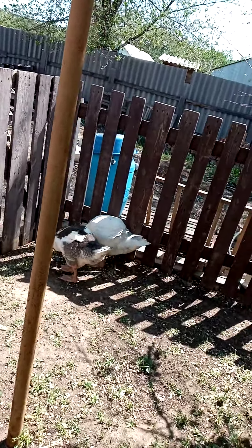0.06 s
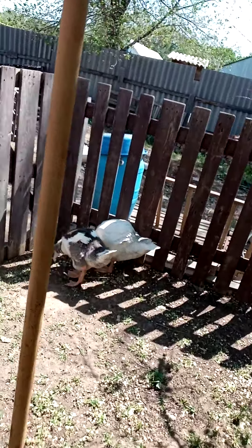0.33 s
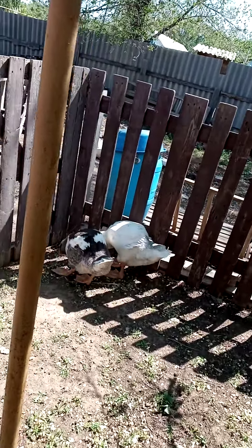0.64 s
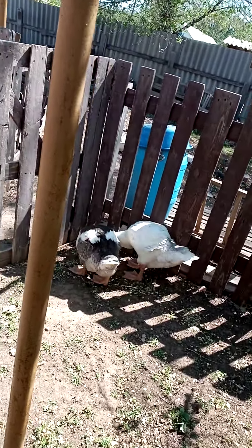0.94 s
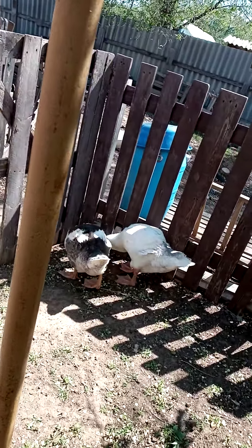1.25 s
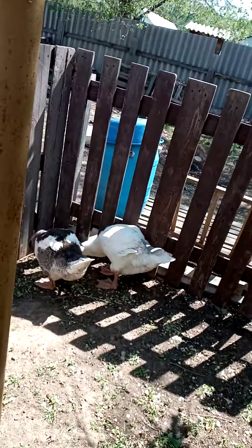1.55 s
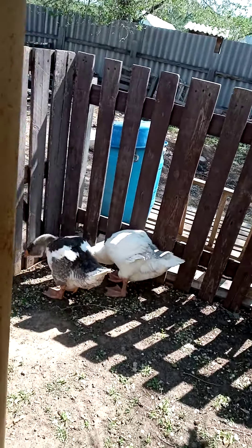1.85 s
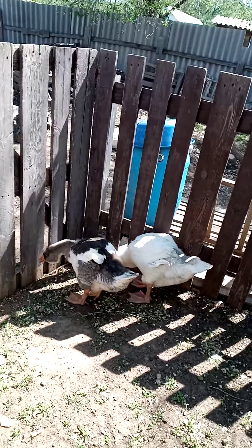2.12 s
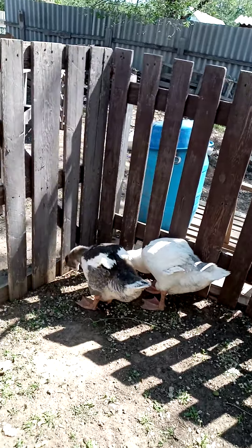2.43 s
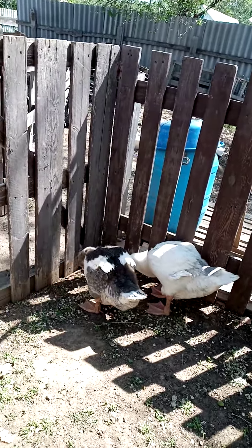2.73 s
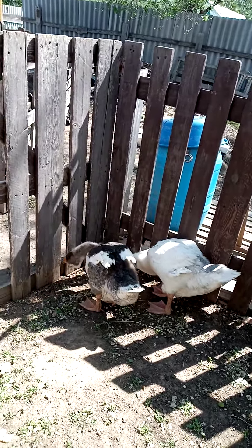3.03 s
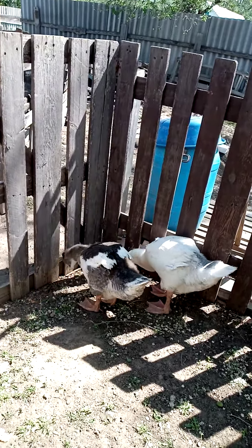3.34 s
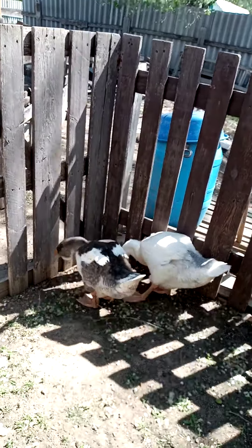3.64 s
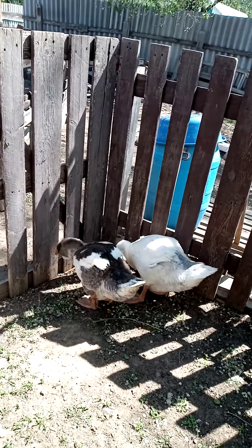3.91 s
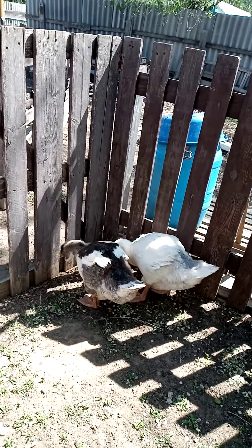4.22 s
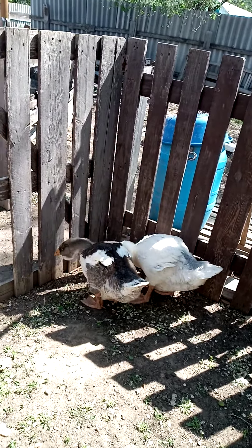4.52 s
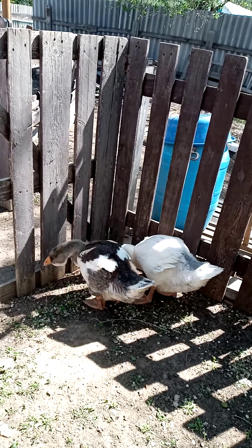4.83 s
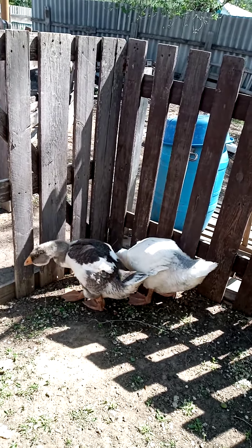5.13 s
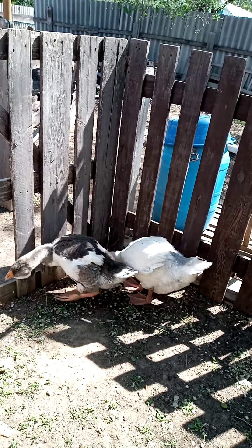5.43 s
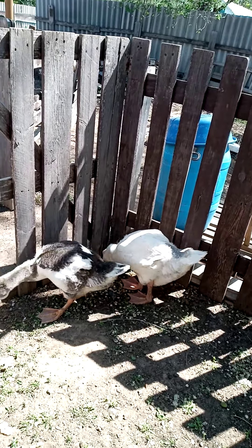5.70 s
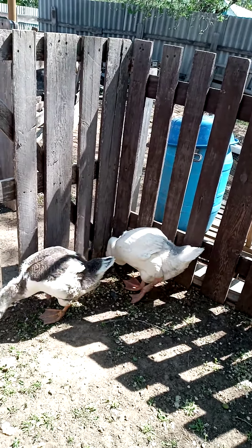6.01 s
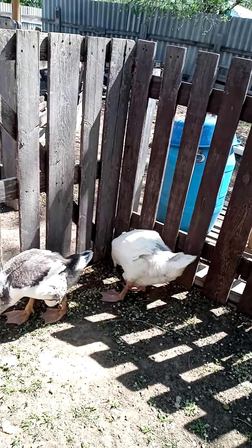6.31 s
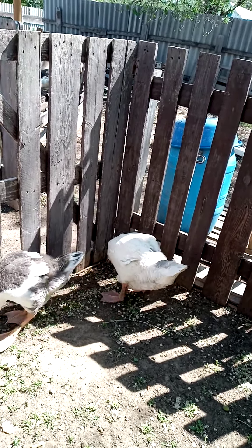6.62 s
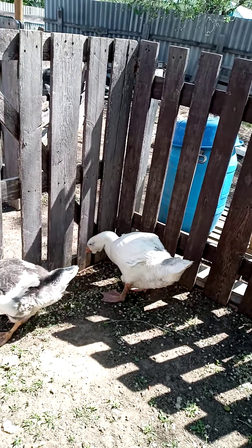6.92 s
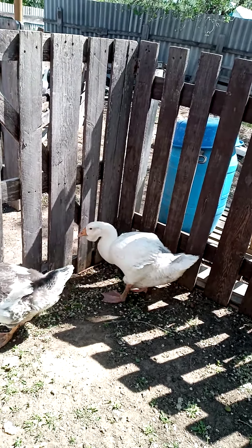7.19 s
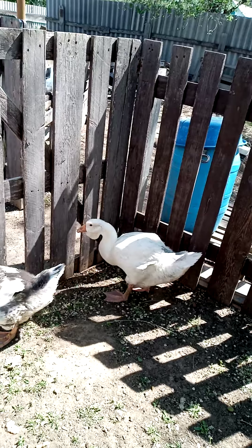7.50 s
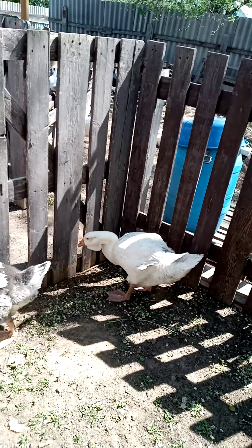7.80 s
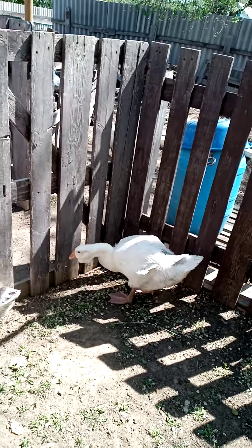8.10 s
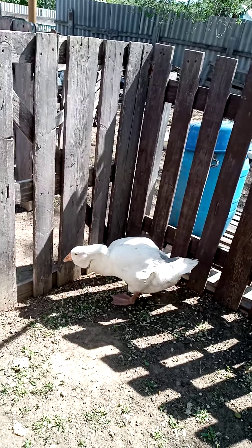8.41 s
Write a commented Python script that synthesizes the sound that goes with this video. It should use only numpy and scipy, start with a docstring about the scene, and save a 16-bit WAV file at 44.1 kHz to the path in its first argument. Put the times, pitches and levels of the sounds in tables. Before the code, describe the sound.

Young geese chatter in a rapid run of thin peeps and hoarse calls, with low thuds on the microphone underneath.

```python
"""Thin, arched peeps over a low rumble: two young geese chatter by a wooden fence in a backyard.
Each call is one push of air that sets a membrane of the syrinx vibrating: near-periodic motion gives
whistles, chaotic motion hoarse rasps, and a break to the octave below a few honks. The fences reflect
the calls as short echoes. Air puffs and handling thud and rustle on a hand-held microphone."""
import sys
import numpy as np
from scipy import signal
from scipy.fft import rfft, irfft, next_fast_len
from scipy.io import wavfile
from scipy.ndimage import map_coordinates

SR = 44100
rng = np.random.default_rng(int(sys.argv[2]) if len(sys.argv) > 2 else 0)


def persist_wave(psi):
    """Save psi, clipped to +-1, as 16-bit WAV."""
    counts = np.round(np.clip(psi, -1, 1) * 32767).astype(np.int16)
    wavfile.write(sys.argv[1], SR, np.atleast_2d(counts).T)


N = 377055

# hoarse calls that clear into a whistle at the crest:
# (start [s], crest [s], end [s], crest pitch [Hz], core level [dB], hiss level [dB], whistle level [dB])
RASP_CALLS = [(0.292, 0.393, 0.494, 1694, -40.5, -54.0, -51.5),
              (1.678, 1.798, 1.952, 1970, -46.0, -56.0, -51.0),
              (2.098, 2.32, 2.408, 2213, -38.5, -48.5, -31),
              (2.445, 2.543, 2.702, 2164, -37.5, -53.0, -46.5), (2.72, 2.848, 3.003, 1800, -41, -50, -48),
              (2.99, 3.037, 3.114, 2620, -40.0, -51.0, -40),
              (3.132, 3.24, 3.374, 1940, -32.5, -43.0, -39.0),
              (3.576, 3.687, 3.798, 2021, -33.5, -41.0, -37.5),
              (4.01, 4.128, 4.228, 2109, -33.5, -40.0, -31.5),
              (4.484, 4.589, 4.698, 2069, -40.0, -41.5, -33.0),
              (4.95, 5.058, 5.128, 2063, -38.5, -39.5, -29.5),
              (5.511, 5.548, 5.631, 2050, -39.0, -44.0, -42.5),
              (5.925, 6.028, 6.123, 2058, -38.5, -46, -38.5), (6.5, 6.54, 6.634, 1960, -45.0, -43.0, -36.5),
              (6.96, 7.017, 7.128, 2000, -39, -43.0, -35.0), (7.52, 7.562, 7.688, 1979, -45, -42.5, -34.5),
              (8.075, 8.146, 8.236, 1906, -45.0, -44.5, -36.0)]


def amp(db):
    """Decibels to amplitude ratio."""
    return 10 ** (np.asarray(db) / 20)


def unit(x):
    """Normalise to rms 1."""
    return x / np.sqrt(np.mean(x ** 2) + 1e-20)


def along(points, hz):
    """Interpolate (frequency [Hz], value) points on a logarithmic frequency axis."""
    f, v = np.transpose(points)
    return np.interp(np.log(hz + 1), np.log(f + 1), v)


def curve(rows):
    """Interpolate (time [s], value) points linearly over the scene."""
    return np.interp(np.arange(N) / SR, *np.transpose(rows))


def wobble(rate, n):
    """Smooth random modulation: n samples of a spline with rate knots a second."""
    knots = rng.standard_normal(int(n * rate / SR) + 4)
    return map_coordinates(knots, [np.arange(n) * rate / SR], mode="wrap")


def filtered(x, response):
    """Linear filtering: multiply the spectrum by a frequency response."""
    m = next_fast_len(len(x) + 8192)
    return irfft(rfft(x, m) * response(np.fft.rfftfreq(m, 1 / SR)), m)[:len(x)]


def noise(spectrum):
    """White noise shaped to a spectrum, at rms 1."""
    return unit(filtered(rng.standard_normal(N), lambda hz: amp(along(spectrum, hz))))


def add(track, s, sound):
    """Superpose a sound on a track from s seconds on."""
    i = max(0, round(s * SR))
    part = track[i:i + len(sound)]
    part += sound[:len(part)]


def yard():
    """Ambient noise: a faint broadband floor under slow amplitude modulation."""
    # background spectrum: (frequency [Hz], level [dB])
    spectrum = [(30, -31), (150, -1), (450, -10.5), (800, -7), (1400, 0.5), (2000, -4), (3100, -13),
                (4400, -16.5), (5400, -20), (7300, -13.5), (9400, -35), (11200, -25.5), (13300, -48.5),
                (15300, -37), (16000, -57)]
    return amp(-53.5 + 2.4 * wobble(4.2, N)) * noise(spectrum)


def scuffs():
    """Friction noise of handling: dry scuffs rise fast and fade grittily over a faint rustle."""
    # scuffs: (time [s], level [dB], decay scale [s])
    strokes = [(0.245, -41.5, 0.082), (0.592, -48, 0.021), (1.132, -47, 0.067), (1.413, -45.5, 0.016),
               (1.525, -51, 0.13), (1.623, -44, 0.042), (1.959, -48.5, 0.078), (3.606, -46, 0.072),
               (4.936, -46, 0.078), (5.116, -35.5, 0.035), (5.457, -40.5, 0.022), (5.526, -40, 0.066),
               (6.133, -41.5, 0.03), (6.206, -42.5, 0.059), (6.661, -45.5, 0.038), (6.799, -42.5, 0.02),
               (7.407, -54.5, 0.16), (8.447, -52.5, 0.13), (8.532, -47.5, 0.06)]
    # rustle envelope: (time [s], level [dB])
    rustle_levels = [(0, -63.5), (.35, -52.5), (.9, -64), (2.1, -56.5), (2.8, -73.5), (4.8, -85.5),
                     (5.3, -56), (7.3, -58.5), (7.6, -77)]
    # friction spectrum: (frequency [Hz], level [dB])
    spectrum = [(300, -27.5), (1400, 2), (2500, 0), (3500, -5), (5000, -13.5), (7200, 0), (9700, -13),
                (11200, -13.5), (13300, -19), (15200, -14), (16000, -3)]
    force = np.zeros(N)
    for s, db, length in strokes:
        u = np.arange(round(2 * length * SR) + 2) / (length * SR)
        add(force, s, amp(db + 4.5) * (1 - np.exp(-u / 0.044)) * np.exp(-1.2 * u - 1.07 * u * u))
    rustle = amp(curve(rustle_levels) + 4 * wobble(22, N))
    grit = unit(amp(3.8 * wobble(450, N)))
    return (force + rustle) * grit * noise(spectrum)


def thuds():
    """Pressure fluctuations from air puffs and handling: an uneven rumble and quickly damped blows."""
    # blows on the microphone: (time [s], level [dB], knock relative to that level [dB])
    blows = [(0.688, -22, -45), (0.837, -16.5, -32), (1.549, -17.5, -12.5), (1.593, -18.5, -21),
             (2.039, -18.5, -29), (2.268, -25.5, -17.5), (2.56, -17.5, -24), (3.018, -15.5, -13.5),
             (3.057, -17.5, -15), (3.099, -11, -15), (3.392, -16.5, -23), (3.883, -23, -22.5),
             (5.877, -27.5, -30), (5.964, -29, -30), (6.38, -17, -20), (6.43, -16.5, -18.5),
             (6.808, -10.5, -16), (6.951, -17, -17), (7.102, -19.5, -32), (7.218, -16, -27),
             (7.327, -17, -22), (7.777, -16, -8.5), (8.347, -24, -36)]
    # rumble envelope: (time [s], level [dB])
    buffeting = [(0.0, -45.5), (0.55, -54), (0.93, -42), (1.17, -50.5), (2.36, -39.5), (2.64, -45.5),
                 (3.5, -37.5), (3.88, -46.5), (4.9, -57.5), (6.31, -62.5), (6.53, -54), (6.76, -49.5),
                 (6.9, -46), (7.24, -37.5), (7.43, -45.5), (8.0, -42), (8.31, -52), (8.55, -49)]
    # spectra of the rumble and of a blow's deep thump and higher knock: (frequency [Hz], level [dB])
    rumble_spectrum = [(15, -26), (30, -23.5), (60, -1.5), (100, 3), (160, -4), (230, -12.5), (330, -24.5),
                       (500, -58), (1200, -85)]
    thump_spectrum = [(20, -29), (50, -6), (110, -2.5), (170, -0.5), (260, -21.5), (400, -36.5),
                      (1000, -77.5)]
    knock_spectrum = [(80, -30), (250, 13.5), (350, 0.5), (500, -11), (800, -25), (2000, -83), (5000, -87)]
    out = amp(curve(buffeting) + 1.62 + 5.4 * wobble(36, N)) * noise(rumble_spectrum)
    attack_s, t60_s = 0.0079, 0.12
    t = np.arange(SR // 5) / SR
    push = (1 - np.exp(-t / attack_s)) * amp(-60 * t / t60_s)
    thump, knock = noise(thump_spectrum), noise(knock_spectrum)
    for s, db, knock_db in blows:
        i = rng.integers(N - len(t))
        add(out, s, amp(db - 20) * unit(push * thump[i:i + len(t)]))
        add(out, s, amp(db + knock_db - 13.5) * unit(push * knock[i:i + len(t)]))
    return out


def fences(x, early_db, tail_db):
    """Reflection: near boards return eight early echoes, the rest of the yard an exponential tail."""
    # reverberation time: (frequency [Hz], time to fall 60 dB [s])
    t60 = [(200, 0.47), (1800, 0.52), (5000, 0.41), (12000, 0.29)]
    hz, t, bands = signal.stft(rng.standard_normal(SR // 2), SR, nperseg=256)
    decay = amp(-60 * t / along(t60, hz)[:, None])
    tail = signal.istft(bands * decay, SR, nperseg=256)[1]
    response = amp(tail_db) * tail / np.linalg.norm(tail)
    for delay_s, gain in zip(rng.uniform(0.002963, .025, size=8), unit(rng.standard_normal(8))):
        add(response, delay_s, np.array([amp(early_db) * gain / np.sqrt(8)]))
    return signal.fftconvolve(x, response)[:N]


def gesture(start, crest, end, crest_hz, db_per_oct, taper):
    """One push of air arches pitch and loudness together; returns the phase and an envelope of rms 1."""
    rise_oct, fall_oct, reference_s = .32, .42, .1  # depths for a slope this long; longer ones go lower
    u = np.linspace(0, 1, max(64, round((end - start) * SR)))
    t = start + u * (end - start) - crest
    slope_s = np.where(t < 0, abs(crest - start), abs(end - crest)) + 1 / SR
    depth_oct = np.where(t < 0, rise_oct, fall_oct) * np.sqrt(slope_s / reference_s)
    octaves = -depth_oct * (t / slope_s) ** 2
    arch = np.abs(np.sin(np.pi * u)) ** taper * amp(db_per_oct * octaves)
    return 2 * np.pi * np.cumsum(crest_hz * 2 ** octaves) / SR, unit(arch)


def syrinx(phase, arch, db, rough, overtone_db, half_db, db_per_oct, count):
    """Period doubling: alternate membrane cycles differ, adding partials halfway between harmonics."""
    n = len(phase)
    jitter = (0.2 + rough) * wobble(338.4, n)
    waver = 1.2 * wobble(55, n)
    phase = phase + jitter + waver
    growl = 1 + .3 * np.sin(phase / 11 + 1.5 * wobble(90, n))  # a loose flap of the membrane
    tone = growl * np.sin(phase)
    for ratio in np.delete(np.arange(1, count + 1), 1) / 2:  # 0.5, 1.5, 2, 2.5, ...
        if ratio < 2:
            level = half_db + 0.5 * overtone_db
        else:
            level = overtone_db + db_per_oct * np.log2(ratio / 2) + half_db * 0.74 * (ratio % 1 > 0)
        flicker = amp(4 * wobble(45, n))
        partial = np.sin(ratio * phase + rng.uniform(0, 2 * np.pi))
        tone += amp(level) * flicker * arch ** .5 * partial  # a harder push gives a richer tone
    shimmer = unit(amp((1 + 4.54 * rough) * wobble(279.4, n)))
    return amp(db) * arch * tone * shimmer


def honks():
    """Register break: the voice drops an octave to a full harmonic series, filtered by the throat."""
    # glides of the second harmonic:
    # (start [s], end [s], first frequency [Hz], last frequency [Hz], level [dB], overtone level [dB])
    glides = [(1.126, 1.171, 880, 1256, -43, -24), (1.399, 1.434, 1596, 1530, -37, -22),
              (3.407, 3.475, 1566, 1310, -36, -26), (3.788, 3.865, 1920, 1930, -34.5, -25.5),
              (5.13, 5.169, 1060, 1464, -36.5, -16.5), (5.177, 5.205, 1500, 1125, -38, -22.5),
              (5.315, 5.362, 1042, 1490, -40.5, -15.5), (5.419, 5.462, 1372, 1072, -42.5, -19),
              (7.26, 7.307, 708, 1304, -51.5, -2.5), (7.495, 7.563, 859, 1415, -42.5, -8.5),
              (7.747, 7.809, 817, 1301, -44, -12.5)]
    # resonances of the open throat: (frequency [Hz], gain [dB])
    throat = [(300, -21), (600, 14), (1100, 5.5), (2000, 10), (2700, 13.5), (3500, -0.5), (4500, 17),
              (5400, 3.5), (7000, -17.5), (8200, 16.5), (9500, -24.5), (13000, -36.5)]
    bow_oct = 0.0398  # upward bulge in mid-glide
    out = np.zeros(N)
    for start, end, first_hz, last_hz, db, overtone_db in glides:
        u = np.linspace(0, 1, max(64, round((end - start) * SR)))
        bow = np.abs(np.sin(np.pi * u))
        hz = first_hz * (last_hz / first_hz) ** u * 2 ** (bow_oct * bow)
        phase = 2 * np.pi * np.cumsum(hz) / SR
        arch = unit(bow ** 0.38)
        add(out, start, syrinx(phase, arch, db, 0.06, overtone_db, half_db=-7, db_per_oct=-8, count=16))
    return filtered(out, lambda hz: amp(along(throat, hz)))


def smeared(phase, partials, smear_rad):
    """Random phase modulation broadens partials, given as (frequency ratio, level [dB]), into bands."""
    tone = np.zeros(len(phase))
    for ratio, db in partials:
        shake = smear_rad * np.sqrt(ratio) * wobble(299.8, len(phase)) + rng.uniform(0, 2 * np.pi)
        tone += amp(db) * np.sin(ratio * phase + shake)
    return unit(tone)


def rasps():
    """Chaotic vibration: the membrane rattles in an arched core, with a buzz mid-call and hissing air."""
    # air through the open bill: (frequency [Hz], level [dB])
    hiss_spectrum = [(600, -25), (1500, -5), (2300, 10.5), (3100, -4.5), (4000, 1.5), (4650, 1.5),
                     (5350, -1.5), (7200, -12), (8400, -9.5), (9500, -40), (11300, -22), (13500, -65)]
    core_partials = [(.72, -7), (.86, -5), (1, 0), (1.15, -10), (1.33, -17)]
    buzz_partials = [(1.5, -6), (1.8, -8), (2, 0), (2.2, -1), (2.9, -14), (3.3, -13)]
    waver_rad, flutter_db, flutter_per_s = 3.01, 2, 45
    voice, air = np.zeros(N), np.zeros(N)
    for start, crest, end, hz, db, hiss_db, _ in RASP_CALLS:
        phase, arch = gesture(start, crest, end, hz, db_per_oct=5.5, taper=0.53)
        n = len(phase)
        phase += waver_rad * wobble(flutter_per_s, n)
        rattle = unit(amp(2.04 * wobble(379.2, n) + flutter_db * wobble(flutter_per_s, n)))
        core = smeared(phase, core_partials, smear_rad=.56)
        buzz = smeared(phase, buzz_partials, smear_rad=.58)
        add(voice, start, amp(db + 2) * arch * rattle * core)
        add(voice, start, amp(hiss_db - 3) * unit(arch ** 2.2) * rattle * buzz)
        add(air, start, amp(hiss_db - 5) * unit(arch ** 1.3) * rattle)
    return voice + air * noise(hiss_spectrum)


def peeps():
    """Near-periodic vibration: whistles, alone or cresting a rasp, roughened by an unsteady membrane."""
    # whistles: (start [s], crest [s], end [s], crest pitch [Hz], level [dB], roughness [0-1])
    whistles = [(0, 0.019, 0.109, 1832, -40.5, 0.4), (0.074, 0.105, 0.126, 1225, -39.5, 0.3),
                (0.203, 0.245, 0.27, 1286, -33.5, 0.03), (0.351, 0.375, 0.53, 1675, -41.5, 0.5),
                (0.366, 0.426, 0.438, 1422, -36.0, 0.3), (0.479, 0.525, 0.55, 1723, -38.0, 0),
                (0.691, 0.75, 0.96, 1550, -39.5, 0.3), (0.869, 0.89, 0.92, 983, -37.0, 0),
                (0.994, 1.025, 1.15, 1745, -38.5, 0.5), (1.088, 1.212, 1.32, 1659, -33.0, 0.35),
                (1.294, 1.326, 1.42, 2000, -33.5, 0), (1.436, 1.558, 1.627, 1610, -29.5, 0.15),
                (1.558, 1.652, 1.77, 1616, -30.0, 0.03), (1.684, 1.737, 1.81, 1994, -34.0, 0.15),
                (1.731, 1.856, 1.903, 1938, -29.5, 0), (1.847, 1.893, 1.972, 1515, -32.0, 0.3),
                (2.084, 2.148, 2.207, 1603, -39.0, 0.52), (2.185, 2.239, 2.29, 1447, -31, 0.17),
                (2.21, 2.257, 2.35, 2280, -35.5, 0.2), (2.267, 2.335, 2.38, 1422, -32.0, 0),
                (2.461, 2.51, 2.611, 1835, -32, 0.14), (2.612, 2.66, 2.7, 1575, -28.0, 0.1),
                (2.71, 2.74, 2.88, 2067, -33.0, 0.4), (2.798, 2.913, 2.94, 1685, -32.5, 0.1),
                (2.927, 2.949, 2.99, 1551, -33.5, 0.34), (3.41, 3.483, 3.557, 2206, -37.0, 0.75),
                (3.596, 3.63, 3.75, 1847, -36.0, 0.03), (3.651, 3.677, 3.78, 1258, -38.0, 0.03),
                (3.84, 3.852, 3.96, 1662, -38.0, 0.35), (4.312, 4.397, 4.47, 1827, -39.0, 0.5),
                (4.421, 4.481, 4.54, 1419, -36.5, 0.18), (4.605, 4.617, 4.67, 1085, -37.0, 0.8),
                (4.794, 4.861, 4.93, 1912, -35, 0.3), (4.832, 4.869, 4.937, 1490, -36.5, 0.63),
                (5.355, 5.38, 5.435, 1798, -30.0, 0.4), (5.376, 5.405, 5.56, 1746, -35.0, 0.5),
                (5.829, 5.876, 6, 1635, -34.5, 0.28), (5.875, 5.92, 6.01, 1475, -33.0, 0.25),
                (6.238, 6.308, 6.26, 1813, -43.0, 0.4), (6.324, 6.394, 6.43, 2125, -40.5, 0.65),
                (6.379, 6.439, 6.51, 1395, -31.0, 0.25), (6.438, 6.503, 6.53, 1528, -28.0, 0.32),
                (6.684, 6.709, 6.72, 1552, -30.0, 0.15), (6.896, 6.949, 7.01, 1511, -31.0, 0.08),
                (7.319, 7.399, 7.4, 1665, -39.0, 0.5), (7.379, 7.428, 7.49, 1448, -37.0, 0.34),
                (7.87, 7.944, 8.02, 1376, -32.5, 0), (8.03, 8.105, 8.2, 2899, -50.5, 0.6),
                (8.431, 8.45, 8.502, 1364, -42.5, 0.35), (8.492, 8.552, 8.564, 1215, -40.0, 0)]
    # relative strength of the second harmonic: (time [s], level [dB])
    overtones = [(0, -16.5), (1.5, -21.5), (2.4, -17.5), (3.5, -21.5), (4.5, -25), (6, -28), (8.5, -32.5)]
    # resonances of the bill: (frequency [Hz], gain [dB])
    bill = [(300, 13), (700, -7.5), (1100, 3), (2300, 2), (3250, -3), (4400, 1), (5200, -3.5), (6200, -1.5),
            (8000, -4), (11000, -22)]
    lead_s, clearing_rough = .02, .14  # a rasp clears just before its crest
    clearings = [(crest - lead_s, crest, end, hz, db, clearing_rough)
                 for _, crest, end, hz, _, _, db in RASP_CALLS]
    out = np.zeros(N)
    for start, crest, end, hz, db, rough in [*whistles, *clearings]:
        phase, arch = gesture(start, crest, end, hz, db_per_oct=4, taper=0.49)
        overtone_db = np.interp(crest, *np.transpose(overtones)) + 5.5 * rough
        note = syrinx(phase, arch, db, rough, overtone_db, half_db=-14, db_per_oct=-15, count=10)
        add(out, start, note)
    return filtered(out, lambda hz: amp(along(bill, hz)))


def scene():
    """Superposition, in mono, of the geese, their echoes, the yard and the noises at the microphone."""
    geese = peeps() + honks() + rasps()
    background = yard()
    echoes = fences(geese, early_db=-11.5, tail_db=-11.5)
    return (geese + echoes + background + scuffs() + thuds())[None]


def record(dry):
    """Band limiting: the microphone has a third-order bass roll-off and a sharp upper cutoff."""
    low_cut_hz, top_hz = 47, 15850
    response = lambda hz: hz ** 3 / np.hypot(hz ** 3, low_cut_hz ** 3) * (hz < top_hz)
    return np.array([filtered(channel, response) for channel in dry])


dry = scene()
out = record(dry)
persist_wave(out)
```